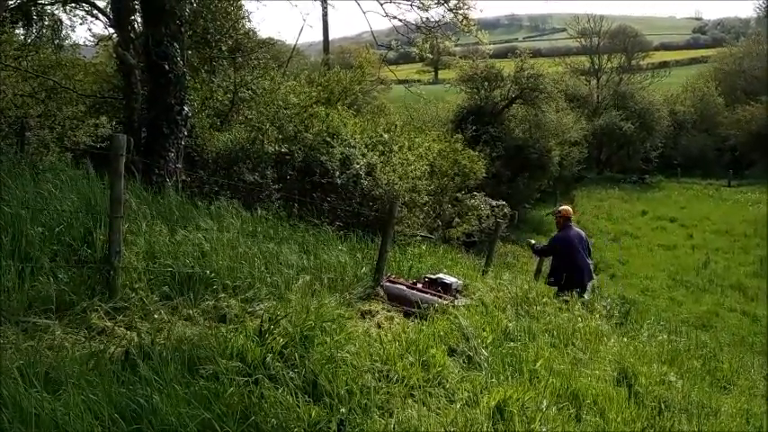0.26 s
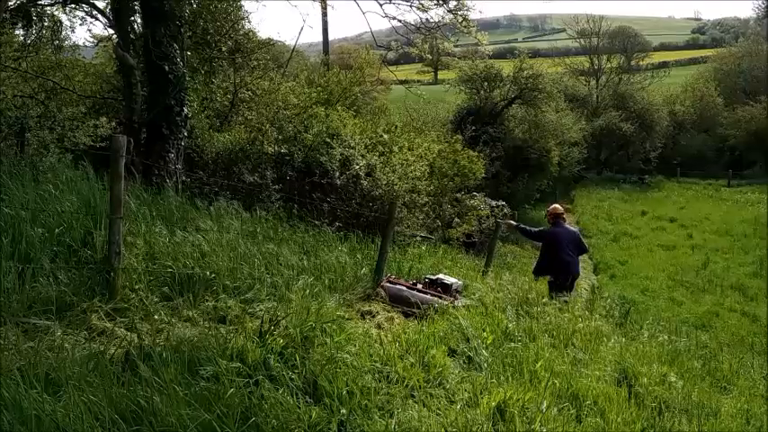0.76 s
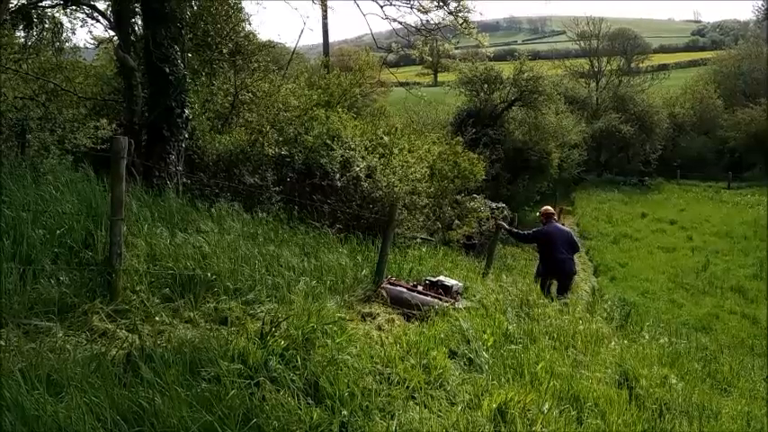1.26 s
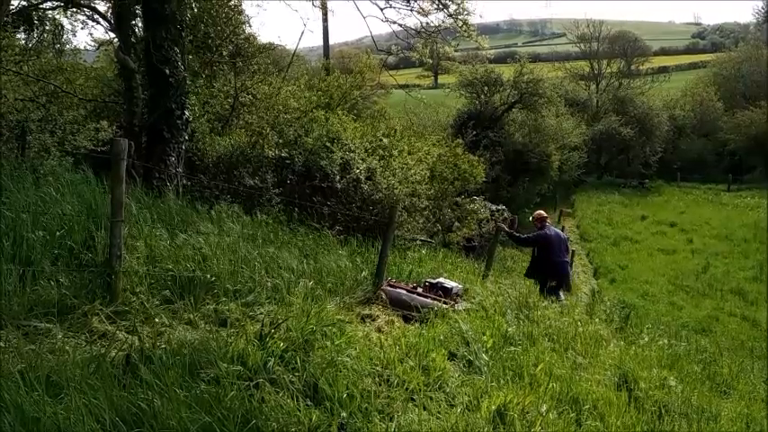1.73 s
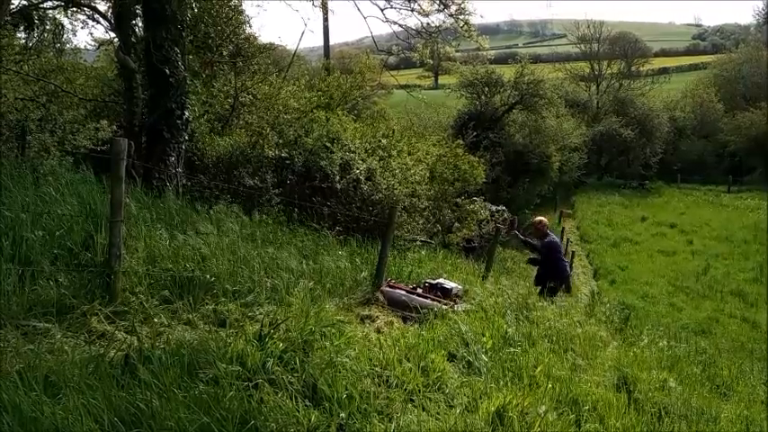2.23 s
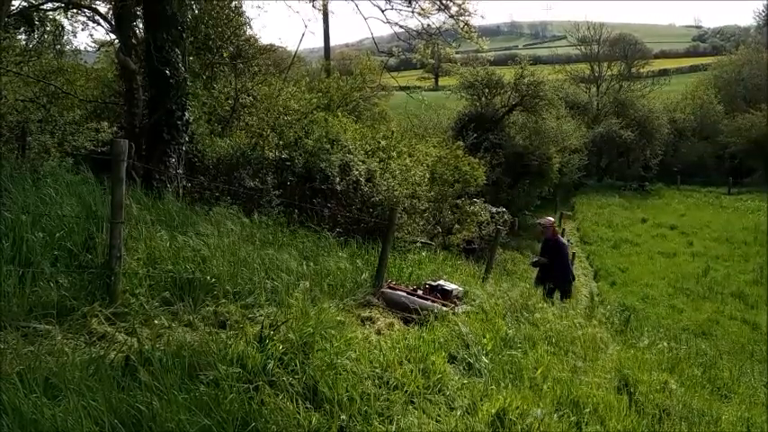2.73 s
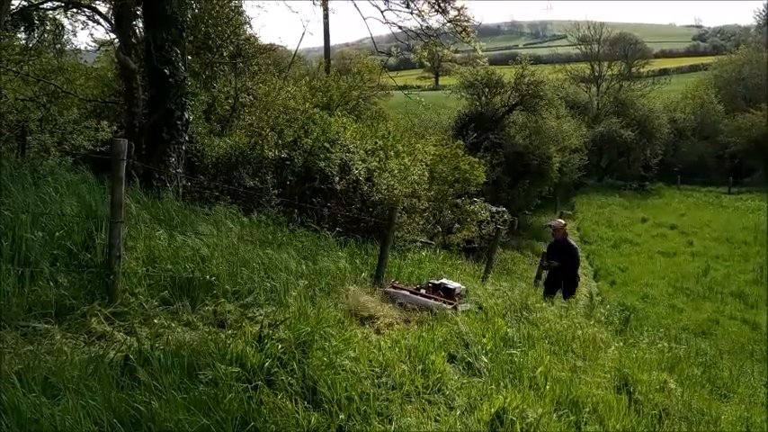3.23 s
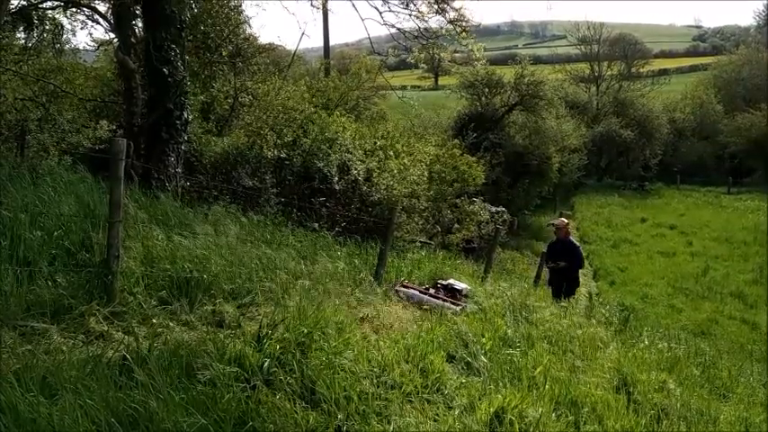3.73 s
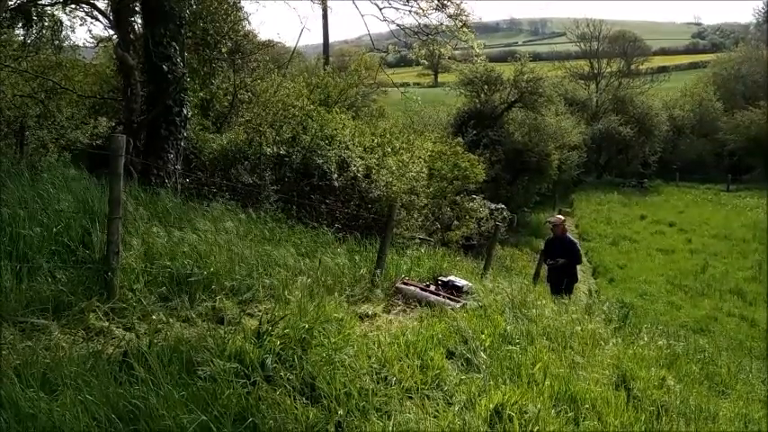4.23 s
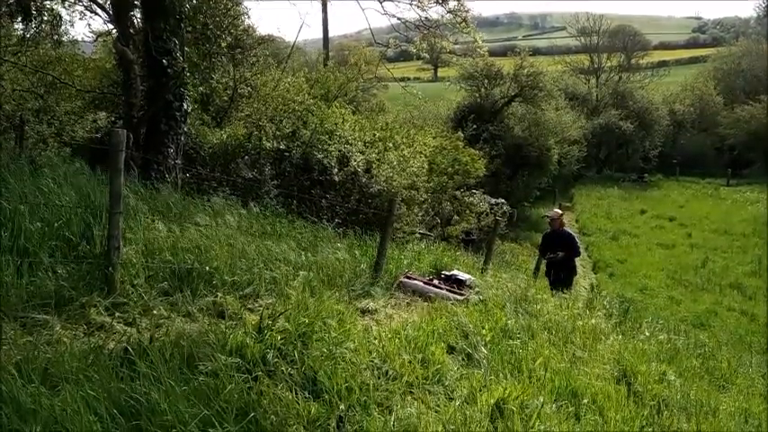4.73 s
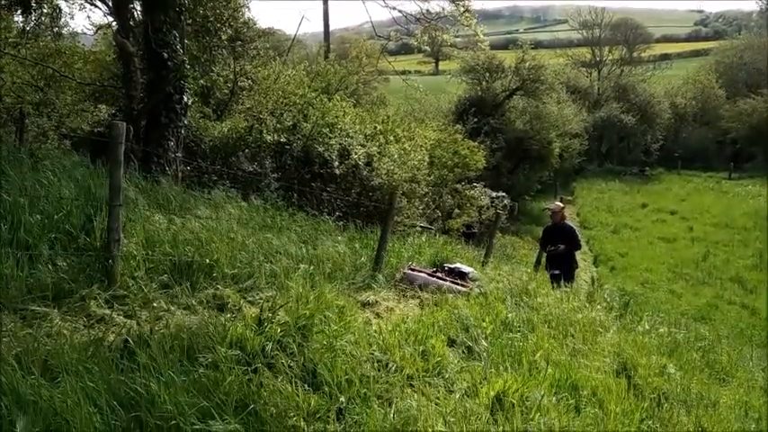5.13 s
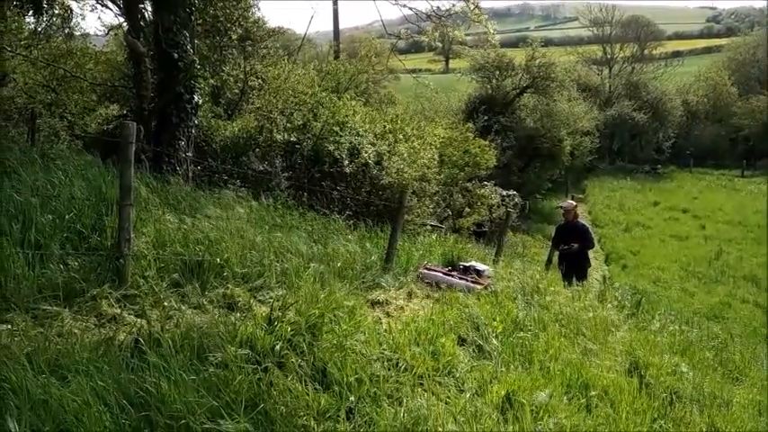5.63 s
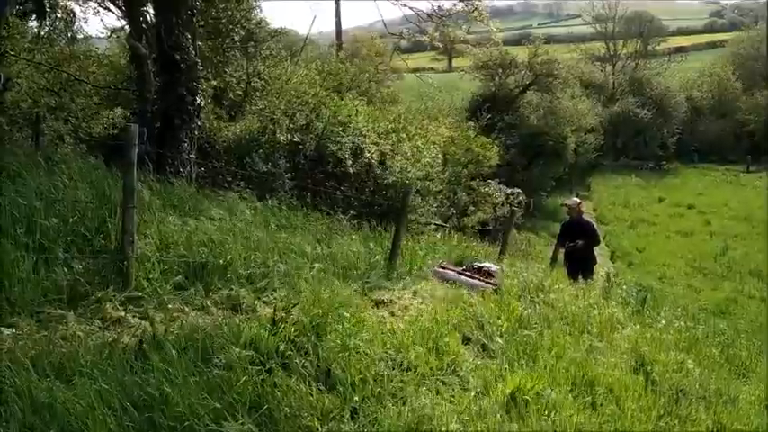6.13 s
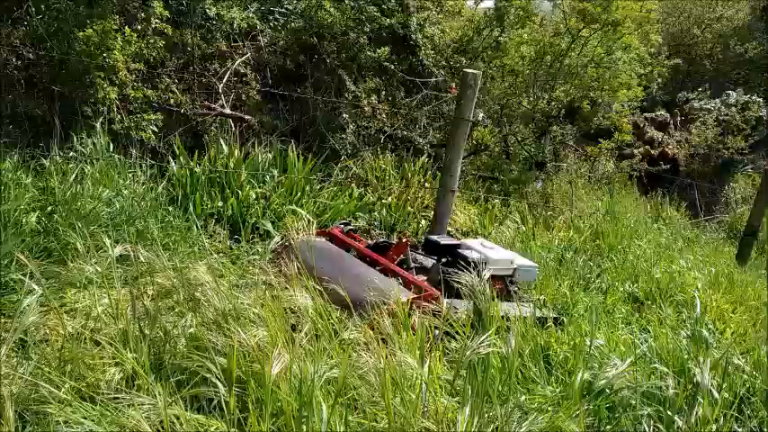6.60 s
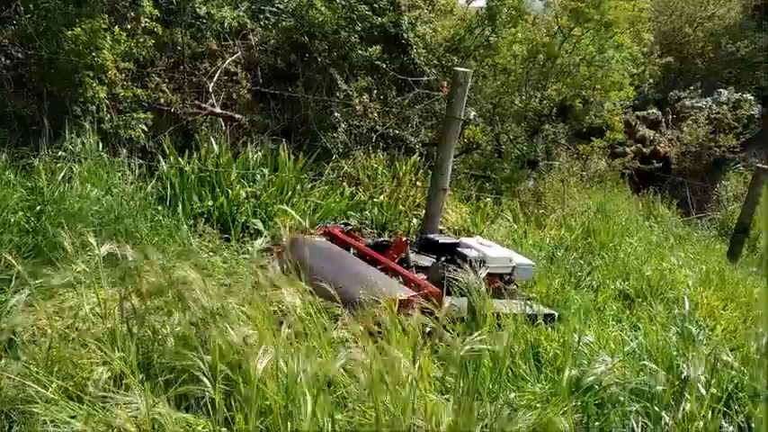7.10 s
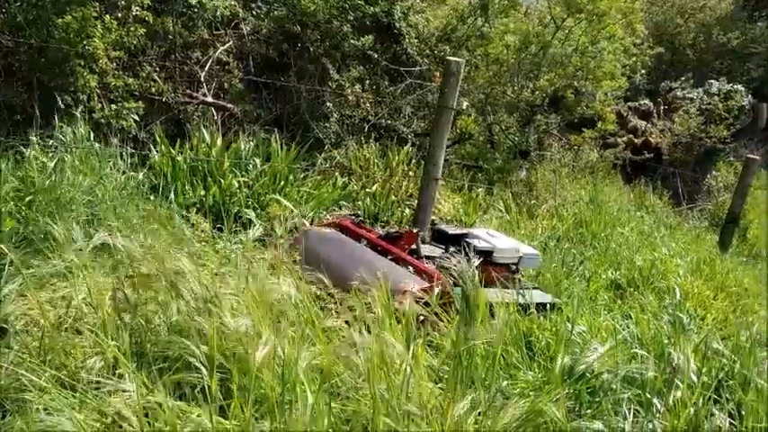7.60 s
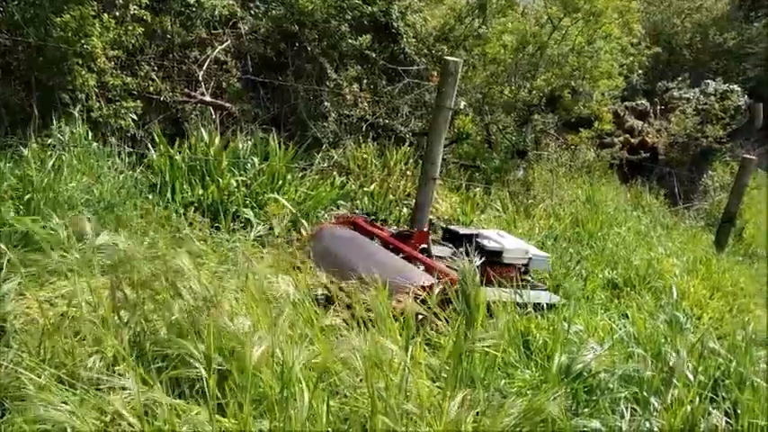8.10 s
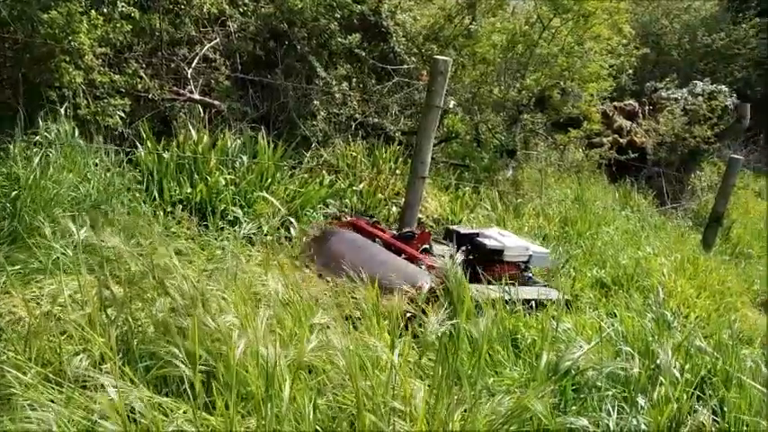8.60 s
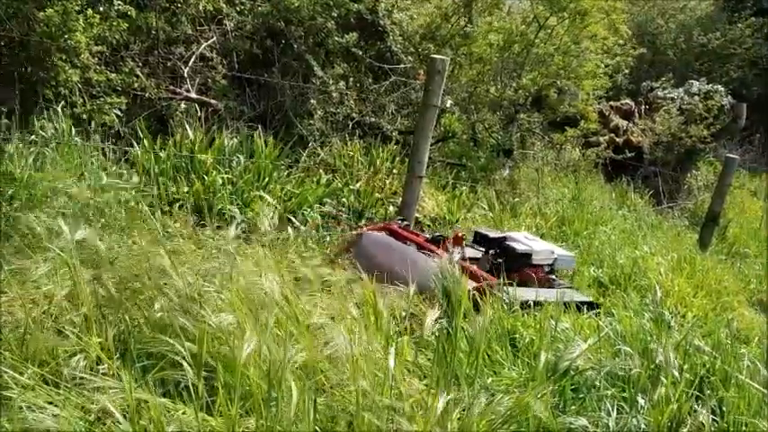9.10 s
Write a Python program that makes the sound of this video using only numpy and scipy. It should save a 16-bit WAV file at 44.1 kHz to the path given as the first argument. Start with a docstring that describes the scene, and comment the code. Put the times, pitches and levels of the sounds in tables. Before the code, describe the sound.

A small petrol mower runs steadily some way off in an open field, a fast, low putter with a raspy hiss. About three seconds in, it slows slightly and labours as the blade swishes through thick grass, with a few snaps and dull thumps. The sound cuts out for an instant, then returns closer and hissier, bogging down briefly near the end. Light wind rumbles on the microphone, and the left side is muffled.

```python
"""A single-cylinder four-stroke mower works through long grass in a field, far off, then closer.
Each firing excites the silencer's resonances and a turbulent jet that rasps and hisses; valve impacts
ring the casing. A belt-driven blade hums, beats with an engine harmonic and shreds stalks. As thick
grass drags the speed down, the governor opens the throttle, altering the engine's level and timbre.
Light wind buffets two microphones; the left one is muffled."""
import sys
import numpy as np
from scipy import signal
from scipy.fft import rfft, irfft
from scipy.io import wavfile
from scipy.ndimage import uniform_filter1d

SR = 44100
rng = np.random.default_rng(int(sys.argv[2]) if len(sys.argv) > 2 else 0)


def file_out(sig):
    """Save sig as 16-bit WAV at sys.argv[1]."""
    # one column per channel
    cols = np.atleast_2d(sig).T
    # limit, then scale
    lim = np.clip(cols, -1, 1)
    pcm = np.round(lim * 32767).astype(np.int16)
    wavfile.write(sys.argv[1], SR, pcm)


N = 412335
T = np.arange(N) / SR
MOVE_S = 6.643  # the listener is near from here on
THUMP_DB = (-21, -21, -22, -25.5)  # far off: running free, full throttle; then the same close by
# swish of fan and blade in the grass: t/s, relative level/dB
GRASS_SWISH = [(2.9, -11), (3.17, -10), (3.45, -16), (5.25, -14.5), (5.5, -11), (5.75, -9.5), (6.1, -10.5),
               (6.4, -16.5), (7.1, -13), (7.5, -11), (8.25, -17.5), (8.62, -14), (8.76, -7.5),
               (8.86, -11.5), (8.92, -24.5), (9.35, -18)]


def exhaust_thump(pulses, load, near):
    """Resonance: each gas slug rings the silencer; the intake gulp follows with opposite sign."""
    # silencer response: f/Hz, gain/dB
    silencer = [(15, -18.5), (34, -9.5), (68, -0.5), (102, -1), (137, 8), (172, 3.5), (206, -0.5),
                (238, -0.5), (260, -4), (274, -1), (310, -12.5), (345, -20), (385, -22), (440, -45),
                (700, -33.5), (1500, -59)]
    gulp = delayed(pulses, .0077) * undb(1 - 5.3 * load)
    return unit(colour(pulses - gulp, silencer)) * loudness(THUMP_DB, load, near)


def exhaust_rasp(pulses, load, near):
    """Turbulence: a crack opens each burst of gas, a loose tappet follows; load shifts the far timbre."""
    # rasp spectra far off, close by, and far off under load: f/Hz, level/dB
    far_spectrum = [(330, -3), (440, -20), (640, -7), (900, -9), (1200, -8), (1520, 4), (1700, 3.5),
                    (1900, -6.5), (2250, 1.5), (2600, -13), (2850, 2.5), (3250, -8), (3700, -2),
                    (4400, -14), (6000, -26)]
    near_spectrum = [(240, -32.5), (400, -13.5), (464, -14.5), (630, -9.5), (903, -17.5), (1330, -9),
                     (1680, -12.5), (1910, -5), (2340, -11.5), (2600, -7), (2860, -13), (3170, -8.5),
                     (5000, -14), (6500, -106), (11000, -120)]
    loaded_spectrum = [(330, -21), (480, -8), (680, -4), (950, -4), (1200, -5), (1520, 8.5), (1850, 1),
                       (2200, 7), (2600, -2), (3000, 4.5), (3400, 0.5), (3950, 3), (4600, -10),
                       (6000, -18.5)]
    opening = throttle(load)
    burst = puff(pulses, delay_s=.0025, rise_s=.0016, decay_s=.0031)
    burst *= undb((1.1 + .8 * opening) * walk(35))
    tappet = puff(pulses, delay_s=.0138, rise_s=.0004, decay_s=.0008)
    tappet *= undb(-9 - 15 * opening - 6 * near + 3 * walk(39))
    swish = undb(curve(GRASS_SWISH) - 2.5 + 4 * near)
    flow = turbulence(burst, intake(pulses, load), tappet, swish)
    crack_spectrum = [(600, -12), (1300, 0), (1900, 0), (3000, -7), (6000, -18)]
    flow += colour(unit(delayed(pulses, .00232)), crack_spectrum) * undb(-10 - 11 * near)
    share = np.clip(2 * load, 0, 1)
    far = (1 - share) * unit(colour(flow, far_spectrum)) + share * unit(colour(flow, loaded_spectrum))
    return np.where(near, unit(colour(flow, near_spectrum)), far)


def exhaust_hiss(pulses, load, near):
    """Jet noise: the outlet spits on each firing; a valve ticks shut about two thirds of a cycle later."""
    # hiss spectra close by and far off: f/Hz, level/dB
    near_spectrum = [(3500, -23.5), (4600, -14), (5300, -9), (7000, -6.5), (8200, -2), (9400, 0.5),
                     (10500, -7.5), (12500, -9.5), (16000, -19.5)]
    far_spectrum = [(2600, -23), (3500, -19.5), (4600, -6), (5300, -4), (7000, -3.5), (8200, 1), (9300, 0),
                    (10500, -5), (12500, -8), (16000, -18.5)]
    jet = puff(pulses, delay_s=.0025, rise_s=.0015, decay_s=.003) * undb(1.2 * walk(35))
    valve = puff(pulses, delay_s=.0207, rise_s=.0008, decay_s=.002)
    valve *= undb(-6.5 - 7.5 * throttle(load) - 2.5 * near + 3 * walk(39))
    swish = undb(curve(GRASS_SWISH) - .22 * near + 2.33 * walk(300))
    flow = turbulence(jet, intake(pulses, load), valve, swish)
    return np.where(near, unit(colour(flow, near_spectrum)), unit(colour(flow, far_spectrum)))


def intake(pulses, load):
    """Flow through a constriction: envelope of the indrawn air, weaker as the throttle opens."""
    return puff(pulses, delay_s=.009, rise_s=.002, decay_s=.005) * undb(-8.5 - 5.5 * throttle(load))


def valve_knocks(cycle, load, near):
    """Impact excitation: valves open and seat four times a cycle, each blow ringing the casing."""
    # blows: t/s after the firing, level/dB (far free, far full throttle, near free, near full throttle)
    valve_blows = [(.0009, -43, -38.5, -38.5, -36), (.00905, -40, -45.5, -38, -48),
                   (.0198, -52, -51, -41.5, -52), (.0229, -50, -53, -39.5, -52)]
    # hollow response of the casing: f/Hz, gain/dB
    casing_ring = [(250, -37.5), (420, -28.5), (520, -4), (630, 1), (720, 0), (950, -6), (1200, -8),
                   (1700, -23.5), (4000, -76)]
    out = 0
    for delay_s, *levels in valve_blows:
        blows = delayed(firings(cycle, scatter_db=1.5, jitter_s=.00013), delay_s)
        out += unit(colour(blows, casing_ring)) * loudness(levels, load, near)
    return out


def casing_tones(cycle, orders, column=1):
    """Forced vibration: crank and valve gear drive wavering harmonics of the firing rate."""
    out = 0
    for order, db in np.array(orders)[:, [0, column]]:
        phase = 2 * np.pi * (order * cycle + rng.random()) + .35 * walk(15)
        out += np.sqrt(2) * undb(db + 2 * walk(8)) * np.sin(phase)
    return out


def casing_radiation(cycle, load, near):
    """Radiation: the casing's tones shift as the mower turns and give way to a growl as it labours."""
    # tones far off: harmonic number, relative level/dB
    far_tones = [(26, -47.5), (30, -45), (44, -38.5), (48, -43), (49, -47.5)]
    # tones close by: harmonic number, relative level/dB before the turn, after it
    near_tones = [(13, -45, -43), (14, -42, -42), (15, -47, -41), (16, -40, -43), (18, -44, -33.5),
                  (29, -60, -37), (30, -41, -50), (38, -48, -41), (39, -41, -42)]
    # growl at full throttle: harmonic number, level/dB against the thump far off, close by
    growl_tones = [(9, -27, -14.5), (10, -18, -27), (21, -28, -20)]
    turn_s, turn_length_s = 7.62, .3
    before, after = (casing_tones(cycle, near_tones, column) for column in (1, 2))
    turned = np.clip((T - turn_s) / turn_length_s + .5, 0, 1)
    song = np.where(near, (1 - turned) * before + turned * after, casing_tones(cycle, far_tones))
    far, close = (casing_tones(cycle, growl_tones, column) for column in (1, 2))
    growl = np.where(near, close, far) * throttle(load) ** 3
    return song * loudness((0, -21, 2, -17.5), load, near) + growl * loudness(THUMP_DB, load, near)


def blade_hum(firing_hz, load):
    """Beats: the blade tone lies near the fifth engine harmonic; load chokes it and lifts its octave."""
    # thick grass slips the belt: t/s, half-width/s, f/Hz lost
    belt_slips = [(3.65, .3, 3.76), (8.87, .09, 9)]
    slip_hz = sum(lost_hz * bell(s, width) for s, width, lost_hz in belt_slips)
    blade_hz = firing_hz * (5.136 - .051 * load) - slip_hz
    phase = 2 * np.pi * np.cumsum(blade_hz) / SR
    tone = np.sin(phase) + undb(-23 + 14.5 * throttle(load) ** 2) * np.sin(2 * phase)
    return unit(tone) * undb(-26.8 - 8 * np.minimum(load, 1) + 4 * np.minimum(slip_hz / 3, 1))


def shredding(near):
    """Shot noise: tiny random cuts merge into a crackle that follows the swish of the blade."""
    # spectrum of a cut: f/Hz, level/dB
    cut_spectrum = [(250, -27), (400, -12), (600, 8.5), (800, 4), (1300, 3), (2100, -3), (3000, -0.5),
                    (5000, 0), (6500, -8), (10000, 0), (16000, -29)]
    cuts_per_s, spread_db = 1400, 4
    cuts = (rng.random(N) < cuts_per_s / SR) * np.sign(noise()) * undb(spread_db * noise())
    return unit(colour(cuts, cut_spectrum)) * undb(curve(GRASS_SWISH) + np.where(near, -22.5, -32.5))


def deck_strike():
    """Damped vibration: the blade clips something woody and a hollow knock dies away in the deck."""
    # deck response: f/Hz, gain/dB
    deck = [(250, -27), (430, -10), (530, 4), (680, 6), (820, -7), (1050, -11), (1450, -1), (2200, -11),
            (5000, -30), (12000, -45)]
    return unit(colour(noise(), deck)) * decay(4.684, decay_s=.018) * undb(-22)


def stalk_snaps():
    """Brittle fracture: dry stalks break on the blade, each with a short, bright crack."""
    # breaks: t/s, level/dB
    breaks = [(3.071, -14), (5.378, -12), (7.881, -13), (8.879, -12)]
    crack = unit(colour(noise(), [(500, -20), (2500, -4), (8000, 0), (16000, -10)]))
    return crack * sum(decay(s, decay_s=.0006) * undb(db) for s, db in breaks)


def thumps_and_crunches():
    """Noise bursts: low, dull thumps like wind buffeting the microphone, with short crunches of grass."""
    # bursts: t/s, half-width/s, low thump level/dB, crunch level/dB
    bursts = [(3.14, 0.019, -28, -28), (3.279, 0.035, -18, -34), (3.767, 0.049, -22, -46),
              (3.867, 0.014, -14, -35), (4.104, 0.012, -20, -44), (4.21, 0.017, -17, -27),
              (4.303, 0.077, -23, -54), (4.692, 0.036, -30, -32.5), (8.573, 0.025, -19, -43),
              (8.839, 0.04, -26, -28)]
    thump_spectrum = [(25, -19), (55, 9.5), (90, 2), (170, -7), (300, -13), (700, -54), (2000, -25)]
    crunch_spectrum = [(150, -20), (300, 2), (420, -4), (550, 3), (750, 3), (1100, -5), (2200, -3),
                       (3000, -8), (5000, -9), (12000, -29)]
    thump = unit(colour(noise(), thump_spectrum))
    crunch = unit(colour(noise() * undb(4 * walk(400)), crunch_spectrum))
    return sum(bell(s, width) * (undb(thump_db) * thump + undb(crunch_db) * crunch)
               for s, width, thump_db, crunch_db in bursts)


def muffled(sound, pulses, load, near):
    """Transmission loss: the left microphone hears the mower faint and dull; bursts ring its cavity."""
    # response of the muffled microphone: f/Hz, relative gain/dB
    muffling = [(30, -4.5), (70, -10), (200, -18), (400, -21), (700, -24.5), (1290, -26), (2150, -31),
                (2900, -42), (3400, -59), (5000, -36), (8000, -39.5), (15000, -42.5)]
    cavity_response = [(500, -5), (1500, -12.5), (2150, .5), (2900, -12.5), (3400, -9), (5000, -12.5),
                       (9000, -28), (14000, -45)]
    cavity = unit(colour(exhaust_rasp(pulses, load, near), cavity_response)) * undb(-49 + 4 * load)
    return colour(sound, muffling) * loudness((2.5, 3, -4.5, 4.5), load, near) + cavity


def wind(near):
    """Turbulent pressure: gusts buffet each microphone separately; the muffled one only rumbles."""
    left_spectrum = [(4, 2.5), (12, -2), (25, -6), (50, -18), (120, -51), (400, -41.5), (2000, -82)]
    right_spectrum = [(5, -16), (15, -4), (32, -1.5), (50, -7.5), (75, -9), (120, -11.5), (250, -18.5),
                      (420, -29), (2000, -39.5)]
    left = unit(colour(noise(), left_spectrum))
    right = unit(colour(noise(), right_spectrum))
    buffet = undb(-10) * bell(6.6, width_s=.031)
    return np.array([left * (gusts(near, far_db=-30.5, near_db=-31) + buffet),
                     right * gusts(near, far_db=-25, near_db=-28.5)])


def gusts(near, far_db, near_db):
    """Amplitude modulation: small random gusts ride on the slow swell of the breeze."""
    # breeze: t/s, relative level/dB
    breeze = [(0, -3), (3, 0), (3.6, 3.5), (5.3, 2.5), (6.2, 0.5), (7.2, 1), (8.4, 3), (9.35, -0.5)]
    return undb(np.where(near, near_db, far_db) + curve(breeze) + 1.2 * walk(4))


def dropout():
    """Gating: the sound cuts out briefly between the two positions and fades back."""
    gap_s, fade_s = .029, .34
    recovered = np.clip((T - MOVE_S - gap_s) / fade_s, 0, 1) ** .56
    return np.where(T < MOVE_S, 1, np.maximum(recovered, undb(-38)))


def throttle(load):
    """Governor action: the opening rises from 0 towards 1 as the speed sags."""
    sag_scale_hz = .84
    return 1 - np.exp(-load / sag_scale_hz)


def loudness(levels_db, load, near):
    """Gain between a layer's free-running and full-throttle levels at either distance."""
    far_free, far_full, near_free, near_full = levels_db
    free, full = np.where(near, near_free, far_free), np.where(near, near_full, far_full)
    return undb(free + (full - free) * throttle(load))


def firings(cycle, scatter_db, jitter_s):
    """Quasi-periodic impulses, one per engine cycle, uneven in strength and timing."""
    times = np.interp(np.arange(int(cycle[-1]) + 1), cycle, T)
    chance = rng.standard_normal((len(times), 2))
    at = np.clip((times + jitter_s * chance[:, 0]) * SR, 0, N - 1).astype(int)
    return np.bincount(at, undb(scatter_db * chance[:, 1]), N)


def puff(pulses, delay_s, rise_s, decay_s, size=2048):
    """Flow envelope after each pulse: Gaussian rise, exponential decay."""
    age = np.arange(size) / SR - delay_s
    shape = np.exp(-np.maximum(age, 0) / decay_s - (np.minimum(age, 0) / rise_s) ** 2)
    return signal.fftconvolve(pulses, shape / shape.max())[:N]


def turbulence(*envelopes):
    """Incoherent sources add in power; the noise is levelled over a quarter second."""
    power = sum(envelope ** 2 for envelope in envelopes)
    return np.sqrt(power / uniform_filter1d(power, SR // 4)) * noise()


def colour(x, points, size=8192):
    """Minimum-phase filter through (f/Hz, gain/dB) points, from the folded cepstrum."""
    hz, db = np.transpose(points)
    grid = np.maximum(np.arange(size // 2 + 1) * SR / size, 1)
    gain = undb(np.interp(np.log(grid), np.log(hz), db))
    cepstrum = irfft(np.log(gain))
    cepstrum[1:size // 2] *= 2
    cepstrum[size // 2 + 1:] = 0
    return signal.fftconvolve(x, irfft(np.exp(rfft(cepstrum))))[:N]


def bell(centre_s, width_s):
    """Gaussian envelope."""
    return np.exp(-((T - centre_s) / width_s) ** 2)


def decay(start_s, decay_s):
    """Sudden onset, exponential decay."""
    return (T >= start_s) * np.exp(-np.abs(T - start_s) / decay_s)


def delayed(x, delay_s):
    """Time delay."""
    return np.interp(T - delay_s, T, x)


def walk(per_s):
    """Random drift of rms 1 with per_s new values a second."""
    return unit(np.interp(T * per_s, np.arange(N), noise()))


def noise():
    """White noise."""
    return rng.standard_normal(N)


def curve(table):
    """A (t/s, value) table at every sample."""
    return np.interp(T, *np.transpose(table))


def unit(x):
    """Scale to rms 1."""
    return x / np.sqrt(np.mean(x ** 2))


def undb(db):
    """Decibels to gain."""
    return 10 ** (np.asarray(db) / 20)


def scene():
    """Superposition of engine, blade and wind; the load is the sag below the free firing rate, in Hz."""
    # governed firing rate: t/s, f/Hz
    firing_rate = [(0.0, 34.62), (2.96, 34.64), (3.38, 33.07), (3.71, 32.77), (4.41, 33.78), (4.71, 33.47),
                   (5.0, 33.95), (5.33, 34.12), (6.38, 33.21), (6.88, 34.56), (7.45, 34.28), (7.64, 33.96),
                   (8.68, 34.24), (8.97, 31.96), (9.16, 33.52), (9.35, 33.71)]
    free_hz, offset_s = 34.65, .0228
    firing_hz = curve(firing_rate)
    load = np.maximum(free_hz - firing_hz, 0)
    near = T > MOVE_S
    cycle = np.cumsum(firing_hz) / SR - offset_s * free_hz
    pulses = firings(cycle, scatter_db=.7, jitter_s=.00008)
    pulses *= undb(1.3 * (1 - throttle(load)) * walk(35))  # a nearly closed throttle burns unevenly
    rasp = exhaust_rasp(pulses, load, near) * loudness((-29, -26, -28.5, -30), load, near)
    hiss = exhaust_hiss(pulses, load, near) * loudness((-25, -20.5, -19, -19.5), load, near)
    gas = (rasp + hiss) * undb(.5 * walk(5))  # swells and eases in uneven grass
    exhaust = exhaust_thump(pulses, load, near) + gas
    engine = exhaust + valve_knocks(cycle, load, near) + casing_radiation(cycle, load, near)
    mower = engine + blade_hum(firing_hz, load) + shredding(near)
    sound = mower + thumps_and_crunches() + deck_strike() + stalk_snaps()
    return (np.array([muffled(sound, pulses, load, near), sound]) + wind(near)) * dropout()


def record(dry):
    """Soft saturation rounds the highest peaks; a steep low-pass cuts the top."""
    lowpass = signal.ellip(12, .1, 90, 16100, fs=SR, output="sos")
    return signal.sosfilt(lowpass, np.tanh(.7 * dry) / .7)


dry = scene()
out = record(dry)
file_out(out)
```